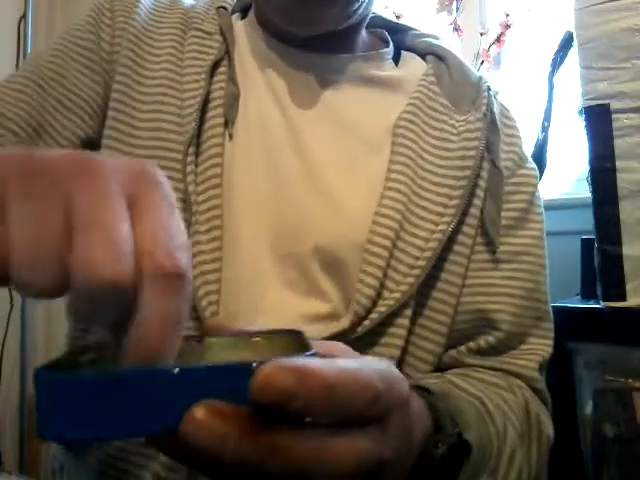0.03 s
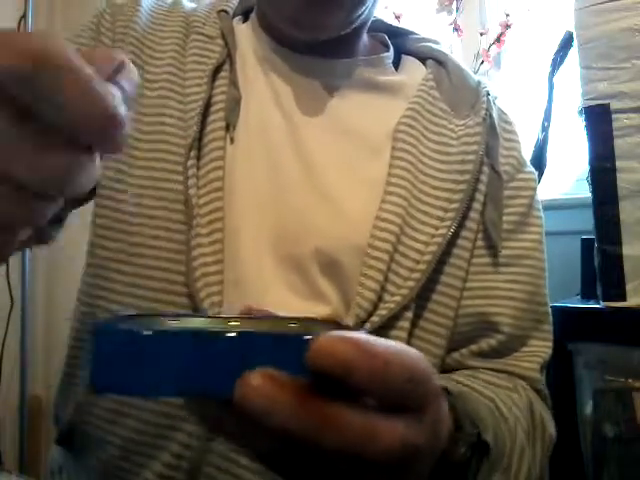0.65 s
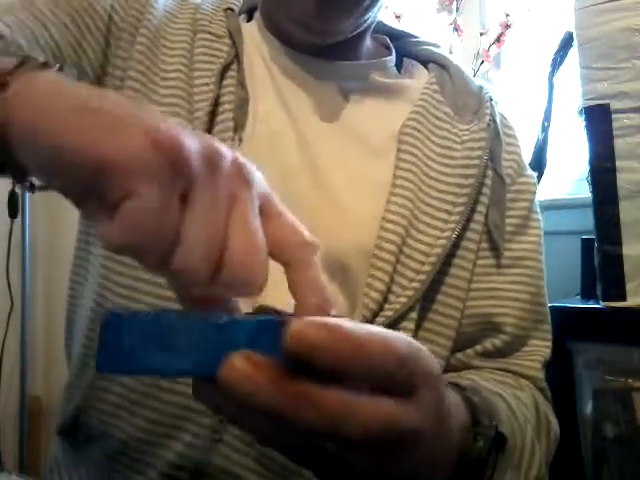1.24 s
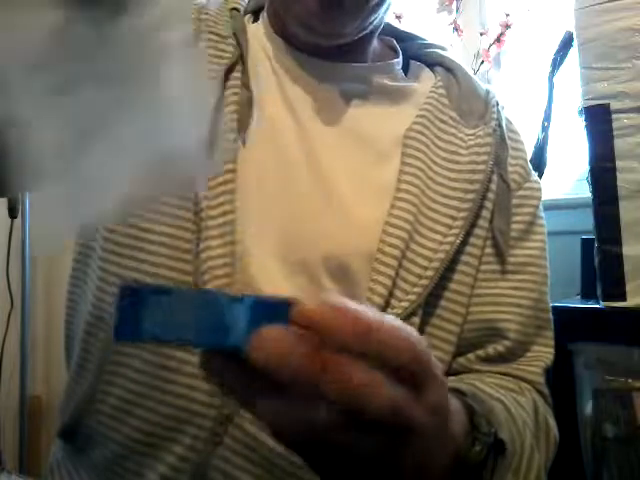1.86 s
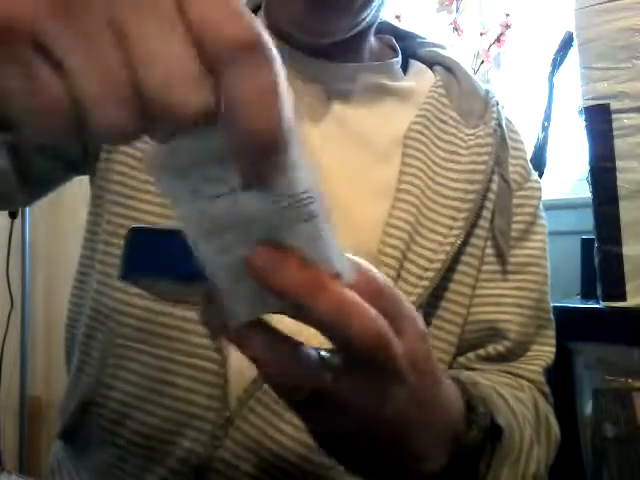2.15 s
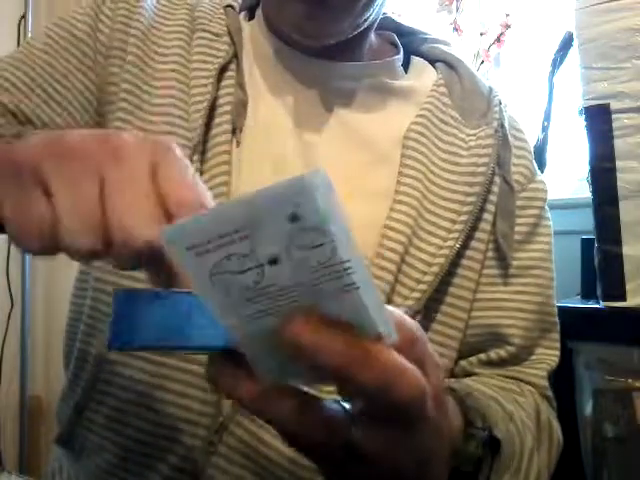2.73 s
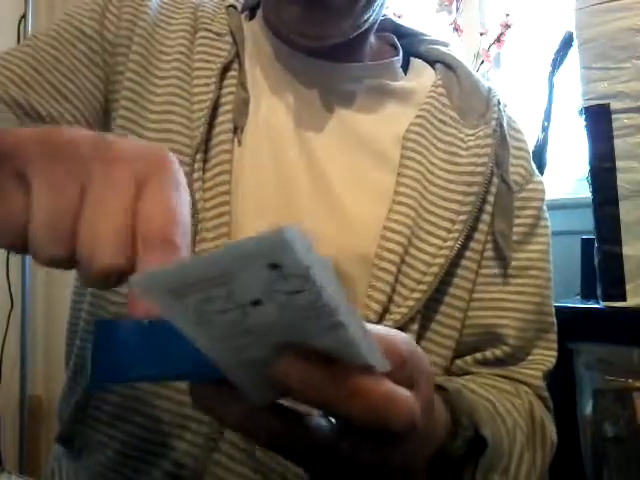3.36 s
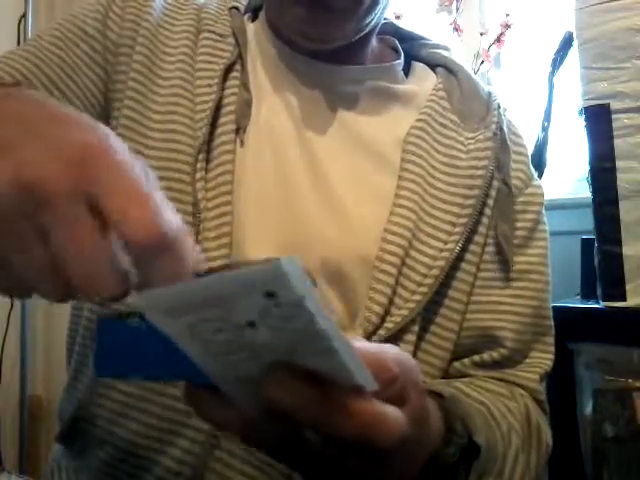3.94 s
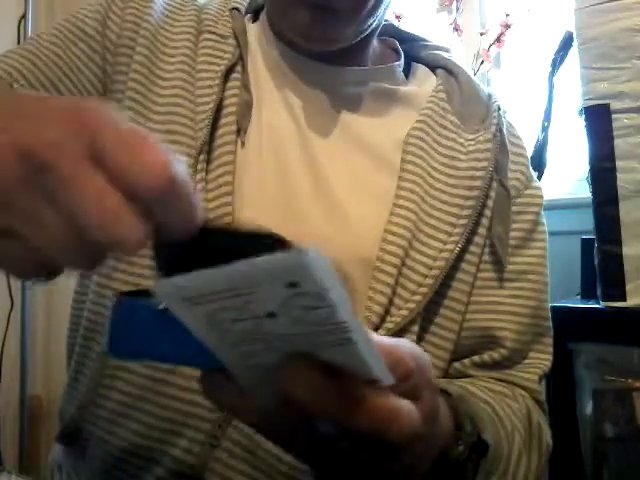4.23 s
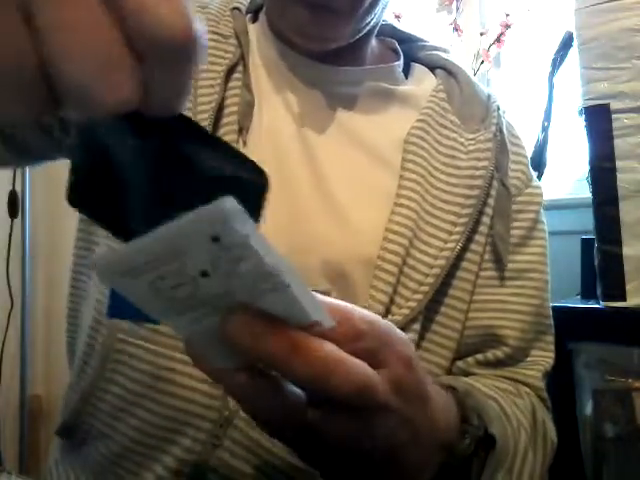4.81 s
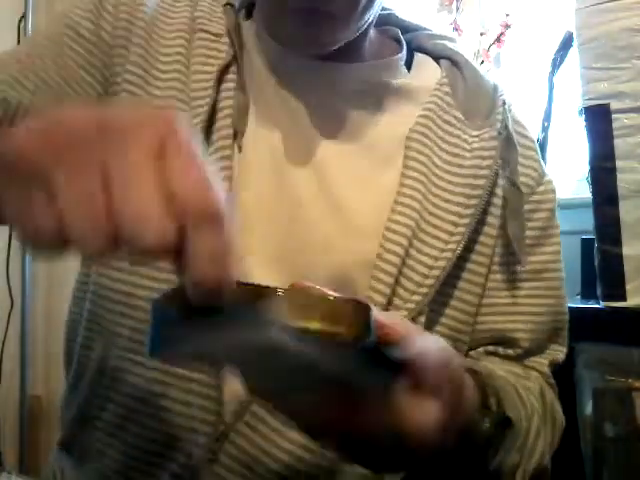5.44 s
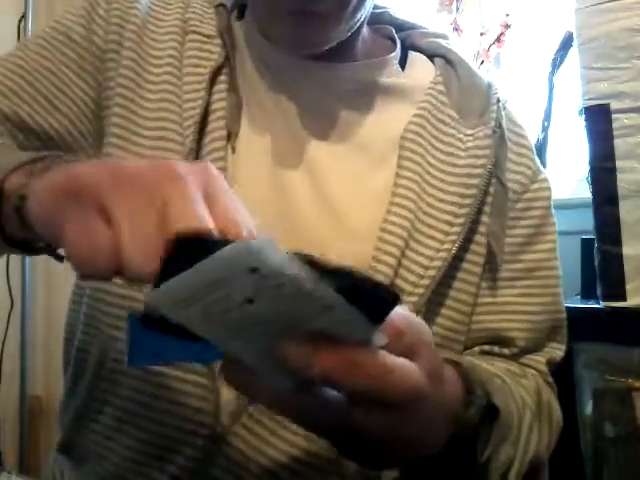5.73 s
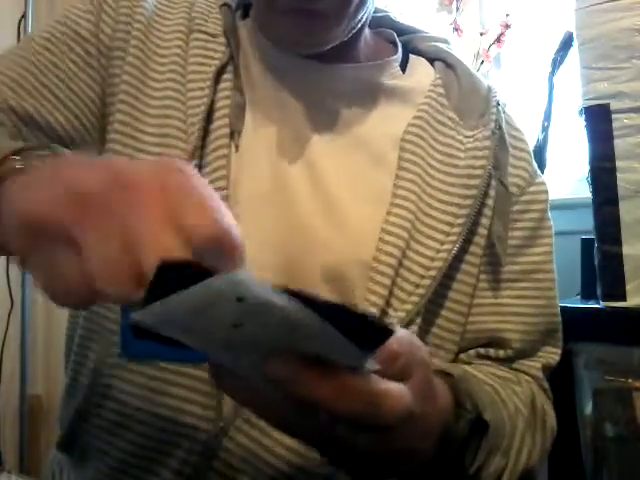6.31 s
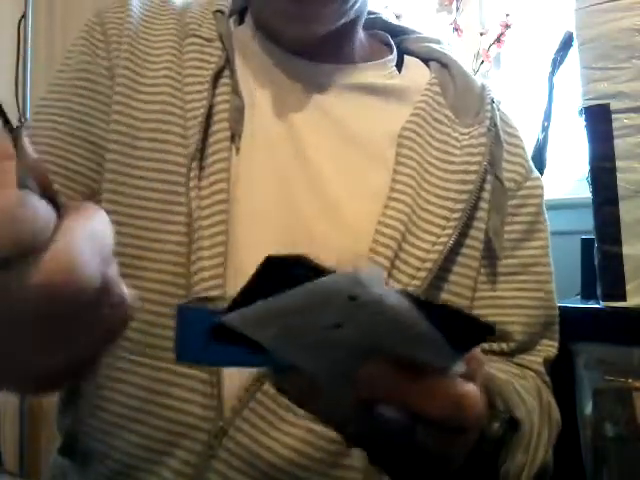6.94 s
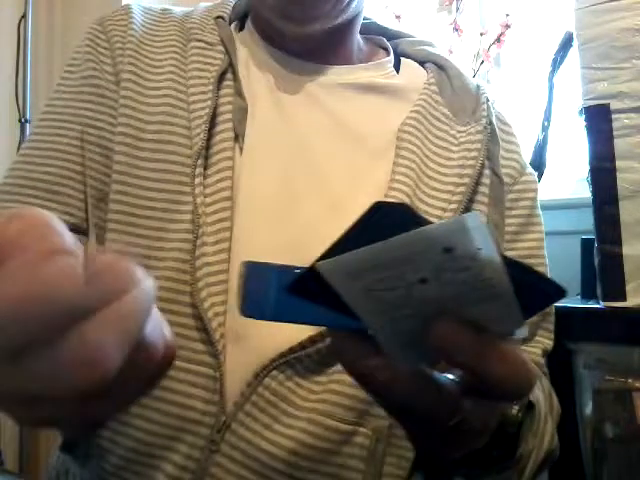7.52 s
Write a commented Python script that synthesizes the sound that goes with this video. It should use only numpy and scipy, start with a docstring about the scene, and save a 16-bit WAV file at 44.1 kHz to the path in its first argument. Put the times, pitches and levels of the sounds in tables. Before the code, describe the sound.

Fingers rummage in a small box, starting with a short ring, scattered clicks and two nail taps. A quick scrape leads into the loudest part, sharp crackling and rustling of folded paper and a wrapper with a few dull knocks. The crinkling returns in shorter spells, then a small object clacks inside the box and the handling dies down. The microphone is close, in a quiet small room with a short echo and faint hiss.

```python
"""A small room, one microphone close to a hand-held box: fingers pick out folded paper and a wrapper.
Each crease snaps in a burst of tiny buckles; between snaps the sheets slide and rustle.
The box rings briefly at first; fingers bump, squeak on and tap it, an edge scrapes its wall, and
something clacks on the bottom. Behind lie a short room tail, faint rumble and microphone hiss."""
import sys
import numpy as np
from scipy import signal
from scipy.fft import rfft, irfft
from scipy.io import wavfile
from scipy.ndimage import uniform_filter1d

SR = 44100
rng = np.random.default_rng(int(sys.argv[2]) if len(sys.argv) > 2 else 0)


def unload_wav(signal):
    """Save mono or channel-first audio to the path in sys.argv[1] as 16-bit WAV at rate SR, clipped to [-1, 1]."""
    wavfile.write(
        sys.argv[1],
        SR,
        np.round(np.clip(np.atleast_2d(signal).T, -1, 1) * 32767).astype(np.int16),
    )


N = 333966
TIME = np.arange(N) / SR

# borders of the four bands of paper, called body, flex, main and edge: f/Hz
BAND_EDGES = [700, 2000, 5000, 8500, 16000]
# spectrum of buckling paper: f/Hz, level/dB
PAPER_SPECTRUM = [(60, -25), (250, -28), (550, -21.5), (780, -15), (1000, -4), (1700, -10), (2700, -8.5),
                  (4200, -1), (6000, 0.5), (7300, -1.5), (8700, -9.5), (11000, -18), (16000, -27.5)]
# strokes of sheet on sheet: t/s, length/s, hiss level/dB, body over hiss/dB
STROKES = [(-.05, 0.11, -47.5, -10), (0.096, 0.41, -67.5, -4.5), (0.572, 0.42, -66.5, -14.5),
           (1.14, 0.096, -69, -8), (1.415, 0.15, -72, -26), (1.582, 0.073, -73, -14),
           (2.088, 0.17, -70, -9.5), (2.547, 0.42, -56.5, -7), (2.913, 0.15, -50.5, -10),
           (3.04, 0.27, -44, -15), (3.246, 0.21, -53, -7.5), (3.394, 0.24, -55.5, -5),
           (3.7, 0.42, -59.5, -9), (4.06, 0.16, -54.5, -9), (4.193, 0.16, -44, -15), (4.28, 0.26, -67, -6),
           (4.858, 0.34, -65, -11.5), (4.941, .13, -61, -19), (5.079, 0.083, -66.5, -1.5),
           (5.369, 0.4, -55, -11), (5.807, 0.25, -66, -3), (6.018, 0.36, -58.5, -9), (6.58, 0.32, -76, -25),
           (7.124, 0.23, -81, -11)]
# spectrum of hands rubbing the box: f/Hz, level/dB
RUB_SPECTRUM = [(30, -19), (65, -2), (120, 2.5), (220, -1.5), (380, -0.5), (700, -8), (1100, -12),
                (3000, -41.5)]
# low modes of the box: f/Hz, level/dB, t60/s
BOX_MODES = [(143, -67, 1), (199, -54.5, 0.31), (423, -68.5, 1), (688, -59, 1), (703, -60.5, 1)]
# spectrum of room rumble and microphone hiss: f/Hz, level/dB
ROOM_TONE_SPECTRUM = [(25, -16.5), (55, -2.5), (100, -4), (150, -5.5), (250, -7.5), (450, -12),
                      (800, -14.5), (1400, -18), (3000, -18), (15500, -20.5)]
# creases snapping: t/s, main level/dB, length/ms, body over main/dB, taut patch f/Hz
SNAPS = [(.0075, -32.5, 1.9, -20, 5500), (.038, -45, 1.9, 4.5, 4370), (.2614, -33, 2.5, -7, 5500),
         (.2843, -38, 1.7, -22, 5630), (.295, -38, 2.4, -9, 4800), (1.211, -42, 6.9, -12, 5470),
         (1.371, -56.5, 7.3, -5.5, 6300), (1.899, -46.5, 7.6, -13, 6670), (1.956, -63, 2.1, 4, 4500),
         (2.0811, -47.5, 1.3, -14, 7000), (2.587, -39.5, 1.7, -10, 6500), (2.598, -34.5, 9, -11, 6430),
         (2.618, -34.5, 1.2, -10, 4590), (2.641, -37, 1.9, -10.5, 5000), (2.717, -36, 2.7, -3.5, 4440),
         (2.783, -37, 2.6, -11, 7160), (3.052, -26.5, 1.55, -13, 4200), (3.0828, -29, 3.7, -11, 5800),
         (3.1305, -32.5, 4.8, -7, 5500), (3.146, -23.5, 2.4, -7.5, 9450), (3.159, -24.5, 1.1, -15, 5700),
         (3.182, -22, 6.1, -17.5, 6130), (3.1891, -17, 3.4, -17, 6870), (3.277, -36.5, 1.2, -9.5, 4370),
         (3.303, -25.5, 2.8, -6.5, 4200), (3.3279, -23.5, 4.6, -15, 4480), (3.3426, -31, 1.2, -7, 4600),
         (3.3545, -26.5, 5.8, -8.5, 4650), (3.381, -29.5, 1.6, -19.5, 6480), (3.419, -30, 6.2, -16.5, 5940),
         (3.479, -24, 1.9, -14.5, 5570), (3.514, -23.5, 8, -1.5, 6000), (3.5224, -16.5, 2.5, -29, 5800),
         (3.5273, -20, 3.3, -12, 5840), (3.5461, -19, 2.7, -6, 4500), (3.5518, -24, 4.3, -11, 6090),
         (3.5623, -19, 1.2, -19, 5800), (3.5841, -26.5, 3.8, -8, 6260), (3.7744, -47, 0.99, 1.5, 4180),
         (3.856, -31.5, 2.4, -8.5, 5030), (3.9062, -32, 1.2, -20.5, 8200), (3.928, -29.5, 2.5, -11.5, 5900),
         (4.0798, -46, 1.1, -5.5, 4820), (4.252, -22.5, 5, -15.5, 4950), (4.3, -29, 2.3, -16, 4960),
         (4.3724, -19.5, 2.8, -15.5, 6360), (4.388, -27.5, 3.4, -12, 6360), (4.716, -47, 0.67, -13.5, 6000),
         (4.8137, -58.5, 1.1, -10, 5940), (5.016, -42.5, 2.3, -7.5, 5430), (5.397, -36, 8.8, -14, 5080),
         (5.4132, -26, 12, -13.5, 4700), (5.481, -37.5, 3.2, -6, 4800), (5.519, -24.5, 13.3, -10, 6800),
         (5.535, -27, 5, -11, 5200), (5.6095, -28.5, 13.5, -10.5, 5540), (5.621, -23.5, 5, -16, 5930),
         (5.704, -37.5, 0.52, -12.5, 5830), (5.716, -40.5, 2.9, -4, 4820), (5.858, -44, 11.4, -6, 6240),
         (6.04, -50.5, 3.3, -7.5, 6430)]
# fingertips bumping the box: t/s, peak level/dB
BUMPS = [(.036, -62), (.283, -56), (1.026, -68), (1.213, -60), (2.127, -58), (2.855, -51.5), (3.189, -53.5),
         (3.521, -37.5), (3.551, -38.5), (3.855, -51.5), (3.926, -48.5), (4.372, -49.5), (5.614, -47),
         (6.168, -53)]
# spectrum of a bump: f/Hz, level/dB
BUMP_SPECTRUM = [(30, -23), (100, -2.5), (200, 1.5), (380, 8.5), (700, -3), (1100, 0.5), (3000, -42)]
# ticks of a nail or paper edge: t/s, main level/dB, length/ms
TICKS = [(0.6053, -30, 1.5), (.616, -36, 0.97), (0.8034, -45.5, 2.6), (.829, -37, 4), (3.9902, -41, 1.1),
         (4.1422, -42, 1.3), (4.168, -32.5, .8), (4.2214, -27, 0.39), (4.328, -28.5, 0.48),
         (4.4666, -42, 0.27), (4.67, -56, .9), (4.734, -48.5, 2.6), (5.125, -44.5, 1.1), (5.1487, -48, 1.1),
         (5.1633, -47, .8), (5.2605, -49, 0.71), (6.5927, -53.5, 12), (6.7534, -45.5, 0.85),
         (7.195, -57, 6.1), (7.303, -47, 10), (7.455, -59.5, 4)]
# ring of a tick: f/Hz, lift/dB
TICK_RING = [(6150, 9.3)]
# fingertips squeaking on the box: t/s, flex level/dB, length/ms, f/Hz
SQUEAKS = [(0.693, -43, 3.4, 3090), (2.063, -57, 8, 3050), (2.082, -56, 1.6, 3000),
           (2.122, -53.5, 2.5, 3110), (2.179, -61.5, 1.3, 3020), (4.614, -53.5, 4.5, 2150),
           (4.955, -51, 6, 2900)]
# a nail tapping the rim: t/s, main level/dB, length/ms, body over main/dB
TAPS = [(1.027, -37, 1.46, 3), (1.087, -37.5, 1.2, -2)]
# resonances of the rim: f/Hz, lift/dB
RIM_RING = [(700, 9), (985, 10.5), (1510, 1.5), (3900, 10.5), (4550, 10)]
# slips of a scrape along the wall: t/s, main level/dB, length/ms
SCRAPES = [(2.813, -37, 11), (2.8254, -22, 8.5), (2.834, -21, 2.7), (2.851, -25.5, 2.5), (2.856, -20, 1.85)]
# resonances of the wall: f/Hz, lift/dB
WALL_RING = [(720, 4.5), (940, 4.5), (3520, 10), (4260, 13.5), (4470, 14), (7500, 7)]
# contents hitting the bottom: t/s, main level/dB, length/ms
CLACKS = [(6.082, -33.5, 3.4), (6.171, -23, 3.4), (6.178, -25, 1.24)]
# resonances of the bottom: f/Hz, lift/dB
BOTTOM_RING = [(560, 16.5), (700, 13), (1170, 11), (1620, 9.5)]
# resonances of the sheets and the open box: f/Hz, width/Hz, lift/dB
HOLLOW_RING = [(1140, 130, 0), (1536, 52, 5), (2114, 110, 3.5), (3500, 38, 2.5), (5680, 510, 2),
               (6770, 400, 4)]
# decay of the room: f/Hz, t60/s
ROOM_T60 = [(200, 0.67), (550, 0.18), (1400, 0.31), (3700, 0.26), (7000, 0.28), (13000, 0.35)]

CREAK_DB, CREAK_RISE_S = -36, 0.0055  # strain building before a 1 ms slip; longer slips creak more


def undb(db):
    """Decibels to gain."""
    return 10 ** (np.asarray(db) / 20)


def on_log(hz, points):
    """Read (f/Hz, value) points on a log-frequency axis."""
    at, value = np.transpose(points)
    return np.interp(np.log(np.maximum(hz, 1)), np.log(at), value)


def colour(x, points):
    """Filter by a curve of (f/Hz, level/dB) points."""
    gain = undb(on_log(np.fft.rfftfreq(len(x), 1 / SR), points))
    return irfft(rfft(x) * gain, len(x))


def band(x, lo_hz, hi_hz):
    """Band-pass."""
    return signal.sosfilt(signal.butter(3, [lo_hz, hi_hz], "band", fs=SR, output="sos"), x)


def unit(x):
    """Scale to rms 1."""
    return x / np.sqrt(np.mean(x ** 2))


def add(track, s, sound):
    """Mix a sound in at s seconds."""
    start = int(round(s * SR))
    sound = sound[max(-start, 0):N - start]
    start = max(start, 0)
    track[start:start + len(sound)] += sound


def buckles(size, spread_db):
    """Dense tiny clicks: most are weak, a few strong."""
    return rng.choice([-1, 1], size) * undb(spread_db * rng.standard_normal(size))


def swell(t, length_s):
    """An envelope that rises quickly and dies away."""
    age = np.maximum(t, 0) / length_s
    return age ** 0.67 * np.exp(-1.15 * age)


def causal(gain):
    """The minimum-phase response with this gain: it rings only after it is struck."""
    cepstrum = irfft(np.log(np.maximum(gain, 1e-6)))
    half = len(cepstrum) // 2
    fold = np.r_[1, np.full(half - 1, 2), 1, np.zeros(half - 1)]
    return np.exp(rfft(cepstrum * fold))


def balance(spectrum, hz, band_rms):
    """Bend a spectrum smoothly towards the given rms over 1 ms in each of the four bands."""
    edges = np.array(BAND_EDGES)
    centres, bins = np.sqrt(edges[:-1] * edges[1:]), np.searchsorted(hz, edges)
    for _ in range(2):
        power = np.add.reduceat(np.abs(spectrum) ** 2, bins)[:-1] / len(hz) / (SR / 1000)
        bend_db = 20 * np.log10(band_rms / np.sqrt(power))
        spectrum = spectrum * undb(on_log(hz, np.c_[centres, bend_db]))
    return spectrum


def avalanches(events, width=0.05, creak=0, size=4096, lead_samples=512):
    """Ringing bursts of clicks, as two tracks: towards the microphone and out into the room.
    Events: t/s, level/dB, length/ms, four band offsets/dB, resonances (width is a share of pitch)."""
    near, around = np.zeros((2, N))
    t, hz = (np.arange(size) - lead_samples) / SR, np.fft.rfftfreq(size, 1 / SR)
    paper = undb(on_log(hz, PAPER_SPECTRUM))
    strain = creak * np.exp(-np.abs(t) / CREAK_RISE_S) * (t < 0)
    for s, db, ms, bands_db, rings in events:
        envelope = strain * ms + swell(t, ms / 1000)
        burst = rfft(buckles(size, spread_db=6.5) * envelope)
        band_rms = undb(db + np.array(bands_db))
        note = 1 + sum((undb(lift) - 1) / (1 + ((hz / f - 1) / width) ** 2) for f, lift in rings)
        # a ringing patch beams its note; off axis the note is much weaker
        for track, ring in (near, note), (around, np.cbrt(note)):
            spectrum = balance(burst * causal(paper * ring), hz, band_rms)
            add(track, s + t[0], irfft(spectrum))
    return np.array([near, around])


def strokes(attack=0.19, release=0.42):
    """Gains of hiss and body: each stroke speeds up and slows down over these shares of its length."""
    hiss, body = np.zeros((2, N))
    for s, length, db, body_db in STROKES:
        progress = (TIME - s) / length
        ramp = np.clip(np.minimum(progress / attack, (1 - progress) / release), 0, 1)
        speed = np.sin(np.pi / 2 * ramp) ** 2
        hiss += speed * undb(db)
        body += speed * undb(db + body_db)
    return hiss, body


def crackle(per_s):
    """Lone buckles pop at random moments; a typical one has rms 1 over 1 ms."""
    clicks = (rng.random(N) < per_s / SR) * buckles(N, spread_db=1.5)
    paper = undb(on_log(np.fft.rfftfreq(N, 1 / SR), PAPER_SPECTRUM))
    paper_rms = np.sqrt(np.mean(paper ** 2))
    return colour(clicks, PAPER_SPECTRUM) / paper_rms * np.sqrt(SR / 1000)


def slide():
    """Paper on paper: fibres catch and slip; pressure brings out the sheet's body and the hands' rub."""
    hiss_gain, body_gain = strokes()
    grip = undb(4.3 * unit(uniform_filter1d(rng.standard_normal(N), size=260)))
    fibres = colour(buckles(N, spread_db=7.5) * grip, PAPER_SPECTRUM)
    hiss, body = unit(band(fibres, 1900, 17000)), unit(band(fibres, 650, 2000))
    rub = unit(colour(rng.standard_normal(N) * grip, RUB_SPECTRUM)) * undb(-6.5)
    strays = crackle(per_s=34) * undb(4.5)
    return hiss_gain * (hiss + strays) + body_gain * (body + rub)


def box_ring():
    """The low modes of the box fade from the start, with a thin high shimmer and a dull murk."""
    modes = sum(undb(db - 60 * TIME / t60) * np.sin(2 * np.pi * hz * TIME) for hz, db, t60 in BOX_MODES)
    shimmer = unit(band(rng.standard_normal(N), 3400, 8200)) * undb(-55.5 - 32 * TIME)
    murk = unit(band(rng.standard_normal(N), 130, 690)) * undb(-64 - 21 * TIME)
    return modes + shimmer + murk


def room_tone():
    """Room rumble and microphone hiss: centred in the bass, wider in the treble."""
    mid, side = (unit(colour(rng.standard_normal(N), ROOM_TONE_SPECTRUM)) for _ in range(2))
    side = colour(side, [(60, -18.5), (250, -8), (1000, -3), (6000, -4), (13000, 2)])
    return undb(-70) * np.array([mid + side, mid - side])


def snaps(typical_hz=5630, typical_db=-30):
    """Each crease creaks, then gives way in an avalanche of buckles that rings a taut patch of paper."""
    events = []
    for s, db, ms, body_db, hz in SNAPS:
        octaves = np.log2(hz / typical_hz)
        flex_db = 1 + 0.25 * body_db - 7.5 * octaves  # wide folds and low patches flex more
        edge_db = -13 + 3.5 * octaves
        lift_db = 10 + 0.08 * (db - typical_db)  # a hard snap rings more clearly
        events.append((s, db, ms, [body_db, flex_db, 0, edge_db], [(hz, lift_db)]))
    return avalanches(events, width=0.13, creak=undb(CREAK_DB))


def bumps(size=4096, lead_samples=256):
    """Soft fingertips push the box: dull, short knocks."""
    track, t = np.zeros(N), (np.arange(size) - lead_samples) / SR
    for s, db in BUMPS:
        knock = colour(rng.standard_normal(size) * swell(t, length_s=0.0053), BUMP_SPECTRUM)
        add(track, s + t[0], knock / np.abs(knock).max() * undb(db))
    return track


def ticks():
    """A nail or a paper edge flicks past: bright, with almost no body."""
    bands_db = [-30.5, -10.5, 0, -9]
    return avalanches([(s, db, ms, bands_db, TICK_RING) for s, db, ms in TICKS])


def squeaks():
    """A fingertip sticks and slips for an instant on one narrow note."""
    bands_db, lift_db = [-25.5, 0, -5, -12], 34
    return avalanches([(s, db, ms, bands_db, [(hz, lift_db)]) for s, db, ms, hz in SQUEAKS], width=0.04)


def taps():
    """Hard taps of a nail ring the rim of the box."""
    events = []
    for s, db, ms, body_db in TAPS:
        flex_db = 2.5 + 1.8 * body_db
        events.append((s, db, ms, [body_db, flex_db, 0, -16.5], RIM_RING))
    near, around = avalanches(events)
    return np.array([near, around * undb(-2)])


def scrapes():
    """A hard edge catches and slips along the wall, which zings in a few narrow modes."""
    bands_db = [-11.5, 3.5, 0, -10]
    return avalanches([(s, db, ms, bands_db, WALL_RING) for s, db, ms in SCRAPES], width=0.022)


def clacks():
    """Something slips from the fingers and hits the bottom of the box, which rings low."""
    bands_db = [-7, -5, 0, -14.5]
    return avalanches([(s, db, ms, bands_db, BOTTOM_RING) for s, db, ms in CLACKS], creak=undb(CREAK_DB))


def hollow(x):
    """Narrow resonances of the sheets and the open box add a brief ring."""
    return x + sum((undb(db) - 1) * signal.lfilter(*signal.iirpeak(hz, hz / width, fs=SR), x)
                   for hz, width, db in HOLLOW_RING)


def room(x, wet_db, gap_s, size=22050):
    """Diffuse reflections reach the microphone after a short gap; the bass lingers longest."""
    t, hz = np.arange(size) / SR, np.fft.rfftfreq(size, 1 / SR)
    noise = rfft(rng.standard_normal(size))
    centres, t60s = np.transpose(ROOM_T60)
    tail = np.zeros(size)
    for share, t60 in zip(np.eye(len(centres)), t60s):
        noise_band = irfft(noise * on_log(hz, np.c_[centres, share]), size)
        tail += noise_band * undb(-60 * t / t60)
    tail *= np.clip(t / gap_s - 1, 0, 1)
    tail /= np.linalg.norm(tail)
    tail = colour(tail, [(200, -1.3), (1200, 2.5), (3000, 1.2), (6500, -1.1), (12000, -1.2)])
    return signal.fftconvolve(x, tail)[:N] * undb(wet_db)


def scene():
    """Paper and box close up and dead centre, the room behind; only the room tone has stereo width."""
    near, around = snaps() + ticks() + squeaks() + taps() + scrapes() + clacks()
    rustle, knocks = slide(), bumps()
    direct = hollow(near + rustle) + knocks
    reflections = room(hollow(around + rustle) + knocks, wet_db=-4, gap_s=0.003)
    return direct + reflections + box_ring() + room_tone()


def record(dry):
    """The recorder cuts steeply above 15.9 kHz."""
    return signal.sosfilt(signal.ellip(10, 0.2, 70, 15900, fs=SR, output="sos"), dry)


dry = scene()
out = record(dry)
unload_wav(out)
```